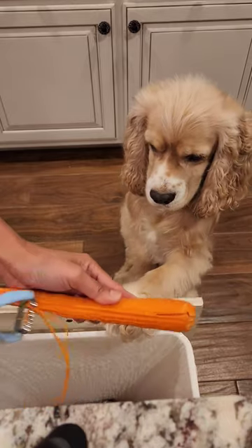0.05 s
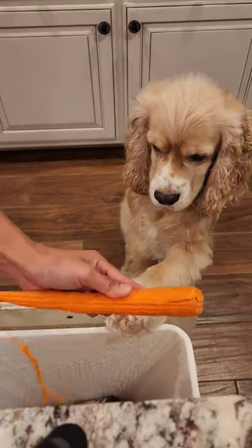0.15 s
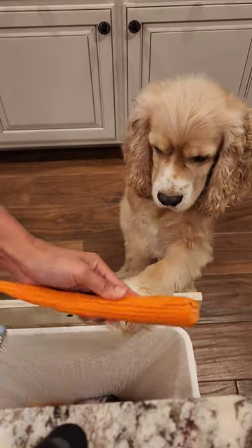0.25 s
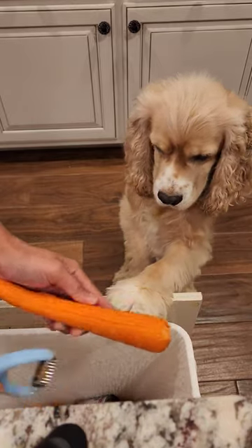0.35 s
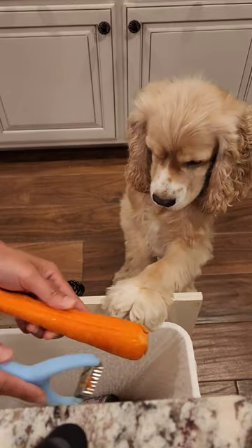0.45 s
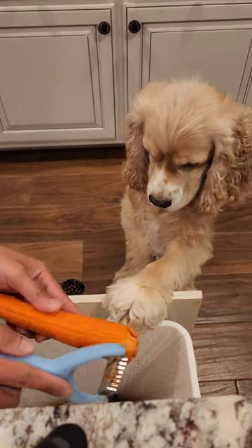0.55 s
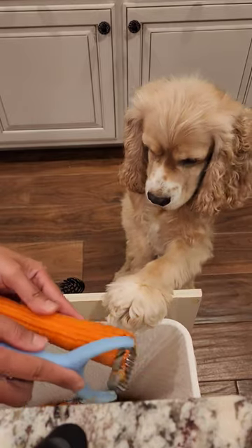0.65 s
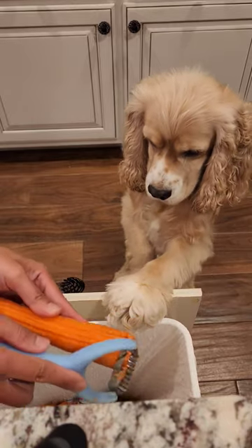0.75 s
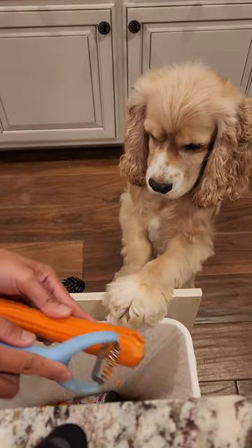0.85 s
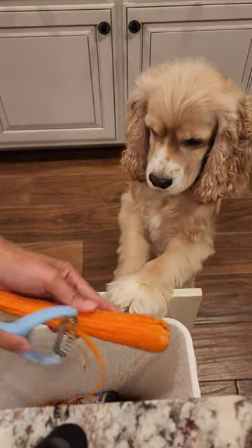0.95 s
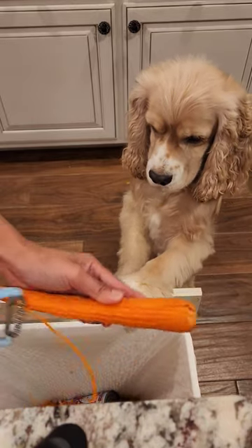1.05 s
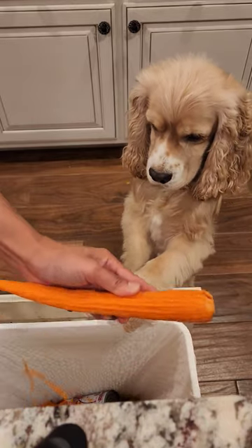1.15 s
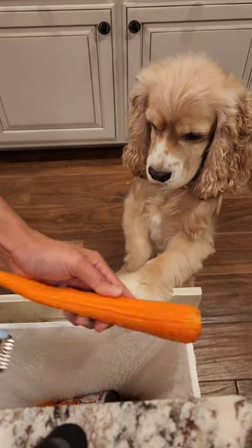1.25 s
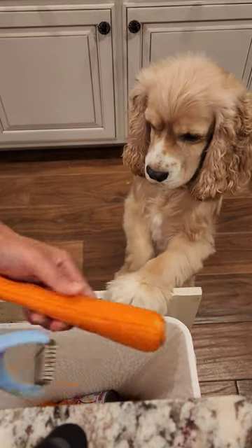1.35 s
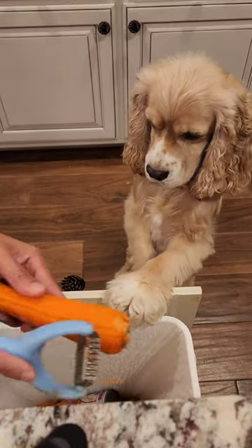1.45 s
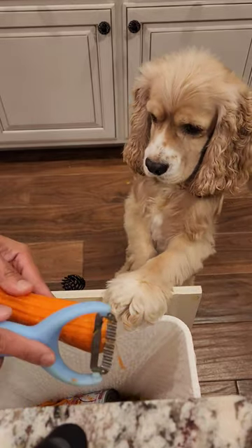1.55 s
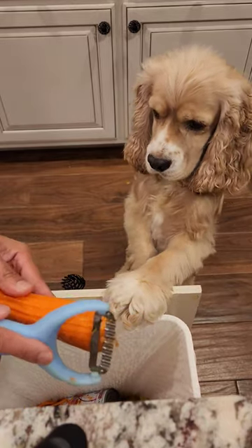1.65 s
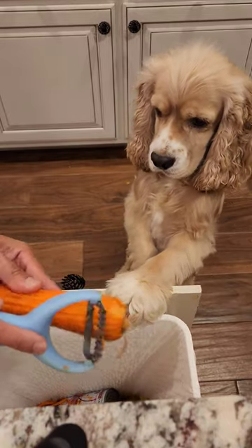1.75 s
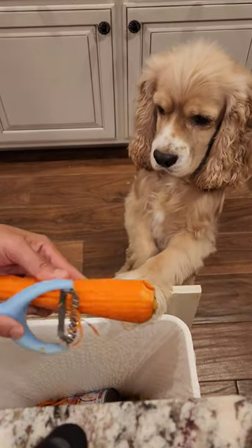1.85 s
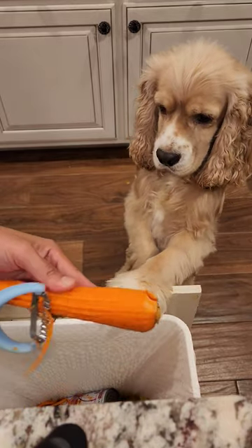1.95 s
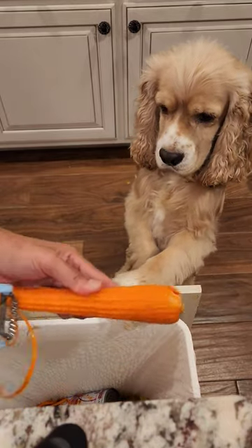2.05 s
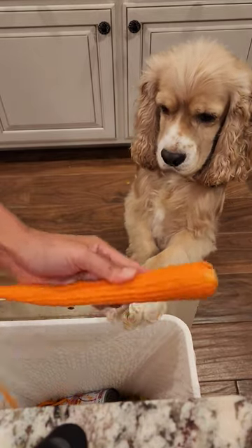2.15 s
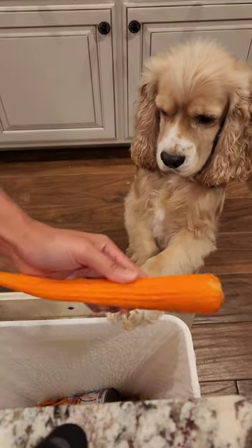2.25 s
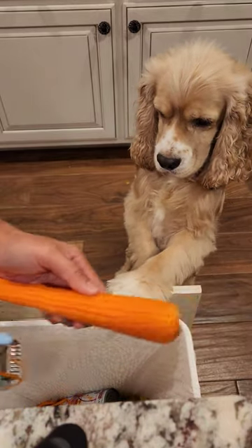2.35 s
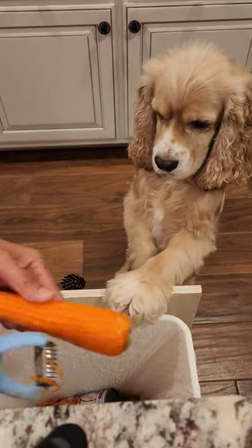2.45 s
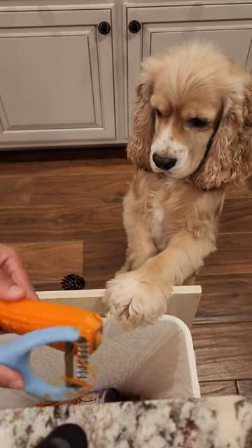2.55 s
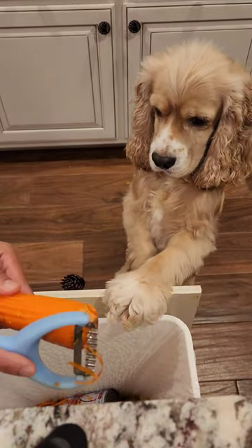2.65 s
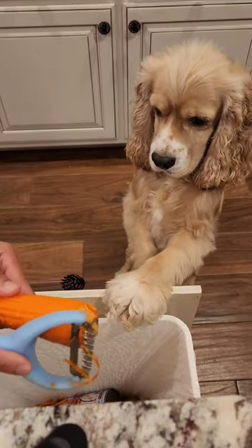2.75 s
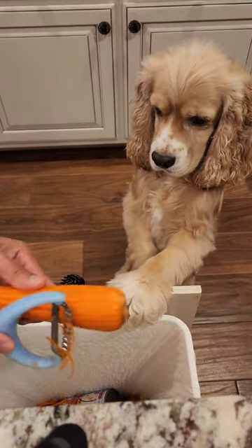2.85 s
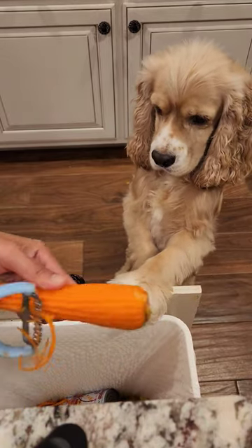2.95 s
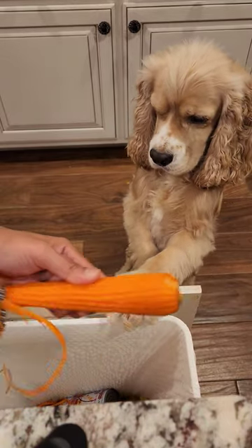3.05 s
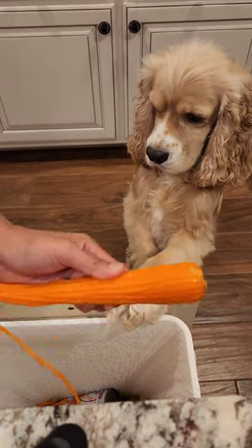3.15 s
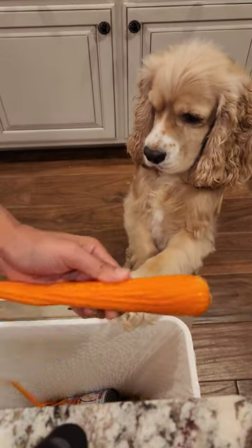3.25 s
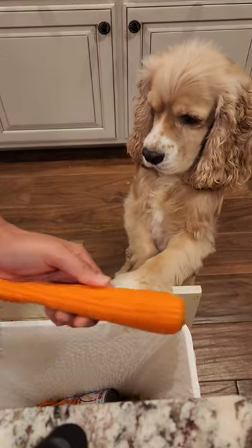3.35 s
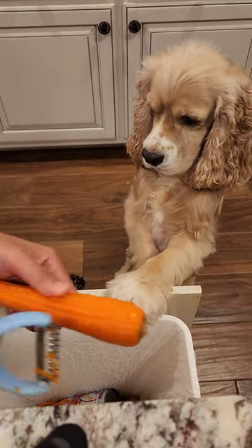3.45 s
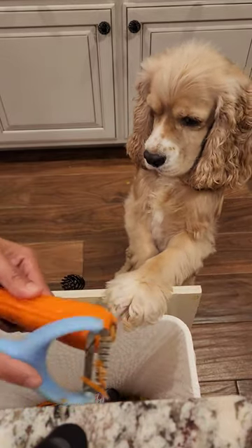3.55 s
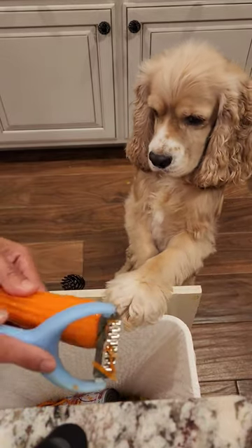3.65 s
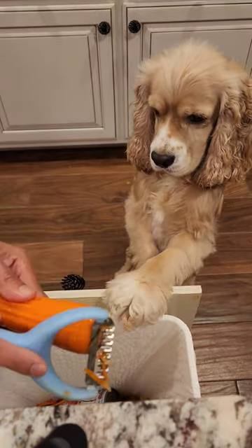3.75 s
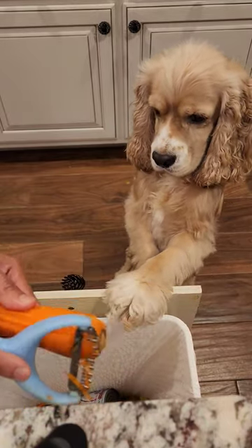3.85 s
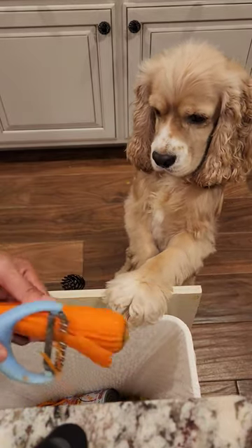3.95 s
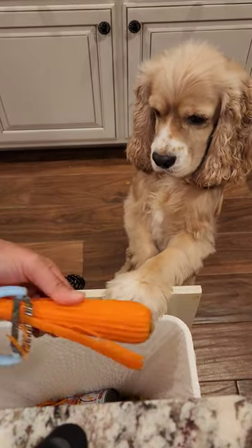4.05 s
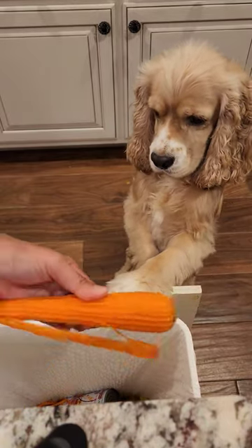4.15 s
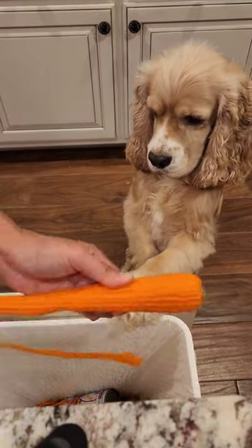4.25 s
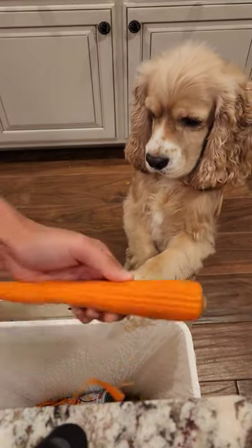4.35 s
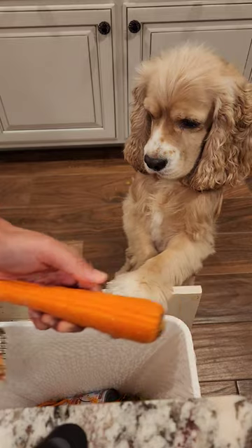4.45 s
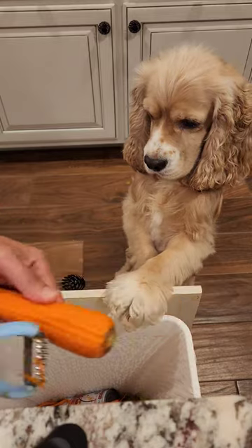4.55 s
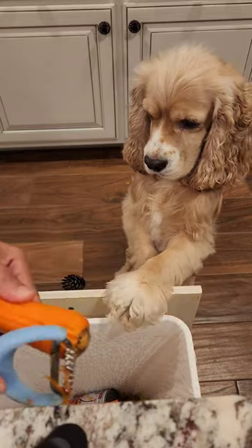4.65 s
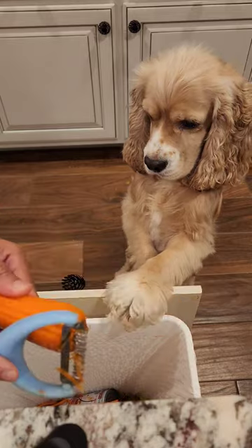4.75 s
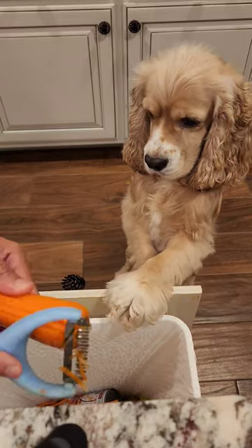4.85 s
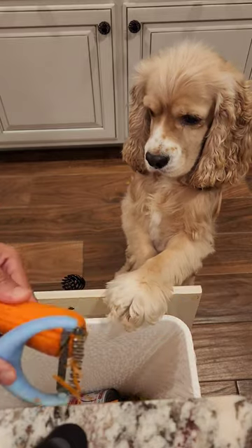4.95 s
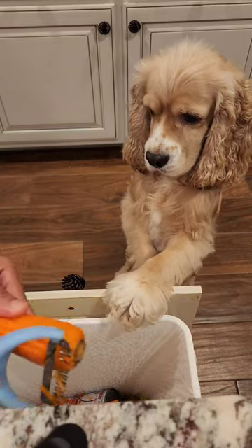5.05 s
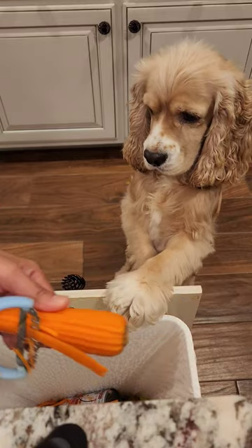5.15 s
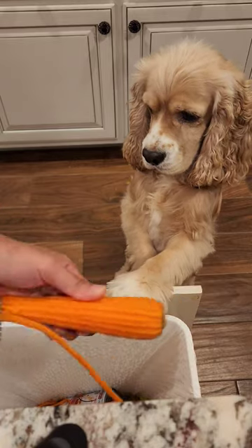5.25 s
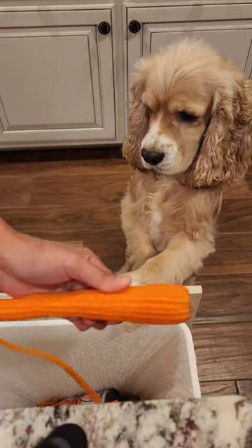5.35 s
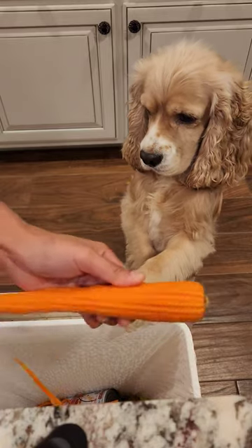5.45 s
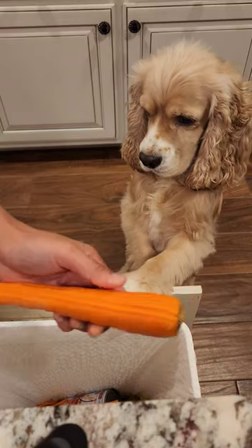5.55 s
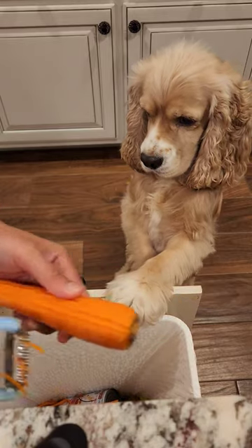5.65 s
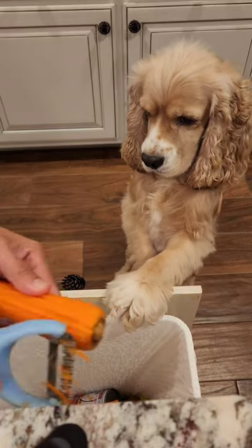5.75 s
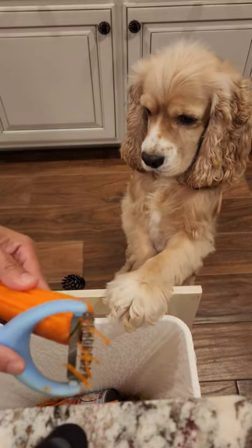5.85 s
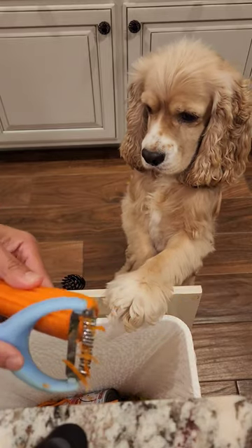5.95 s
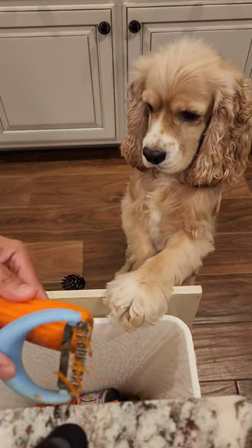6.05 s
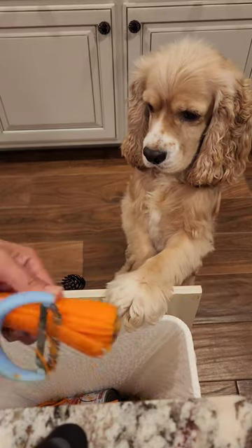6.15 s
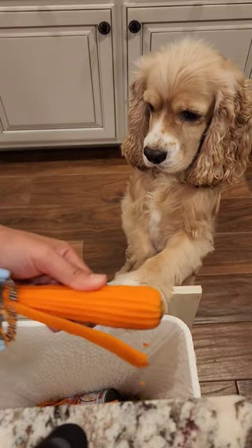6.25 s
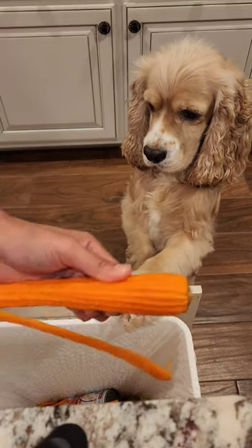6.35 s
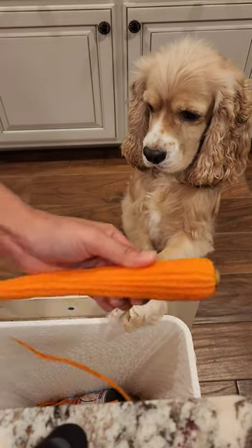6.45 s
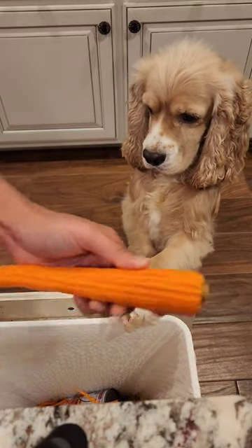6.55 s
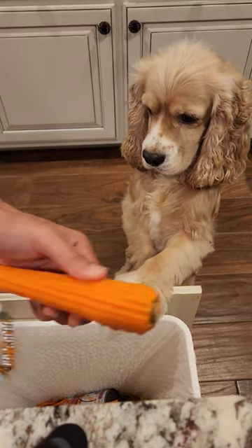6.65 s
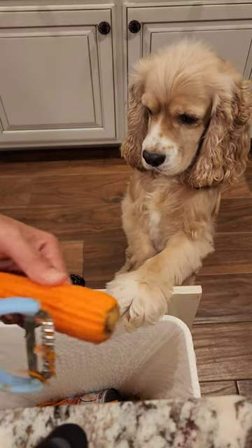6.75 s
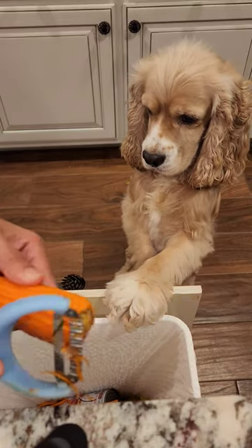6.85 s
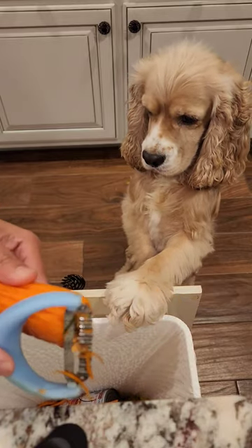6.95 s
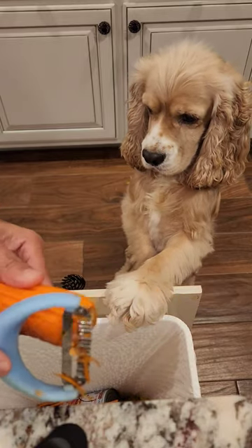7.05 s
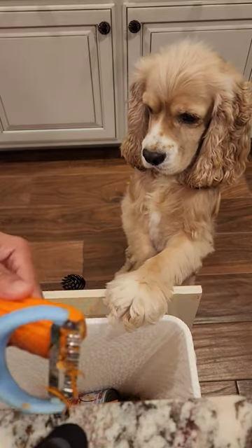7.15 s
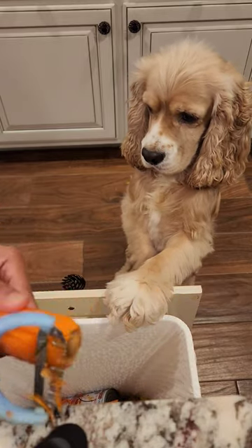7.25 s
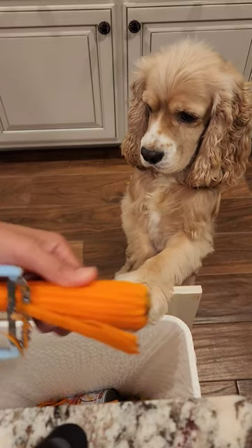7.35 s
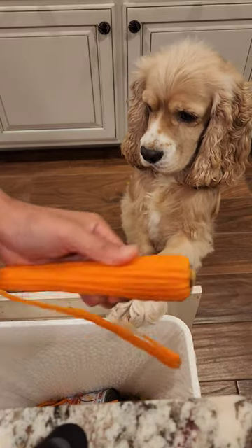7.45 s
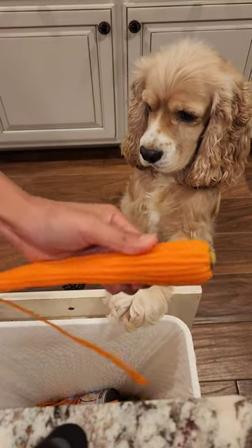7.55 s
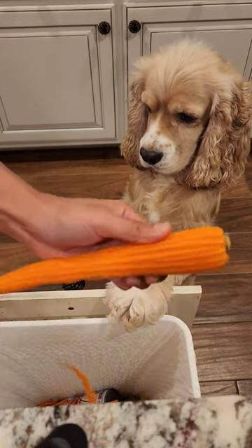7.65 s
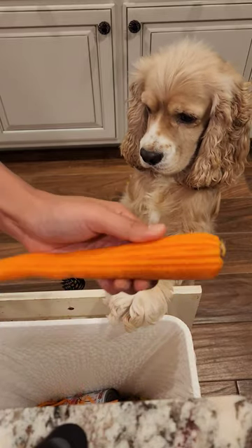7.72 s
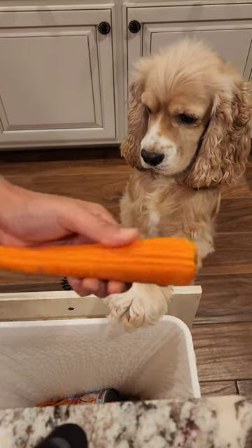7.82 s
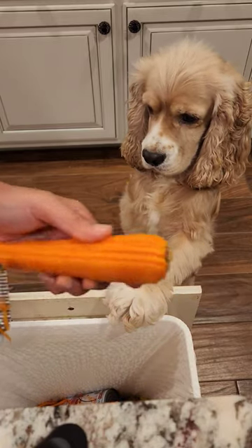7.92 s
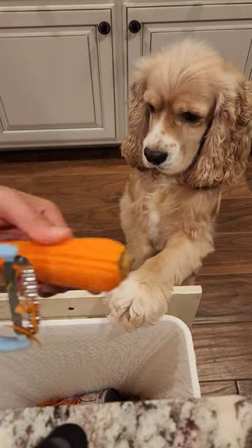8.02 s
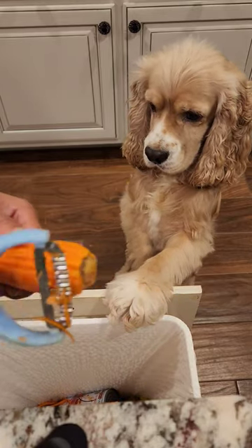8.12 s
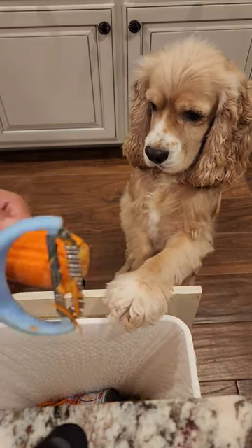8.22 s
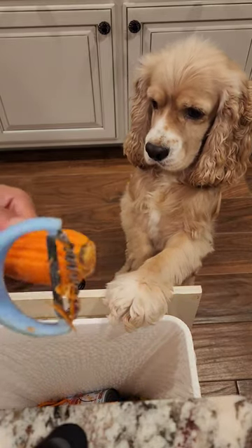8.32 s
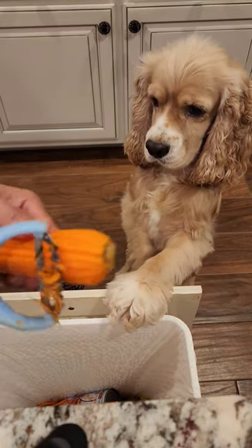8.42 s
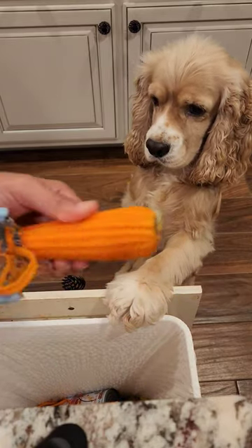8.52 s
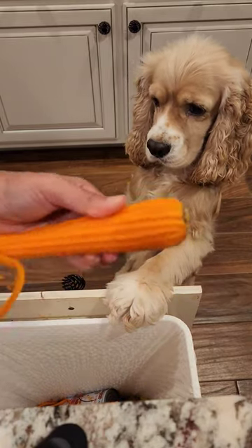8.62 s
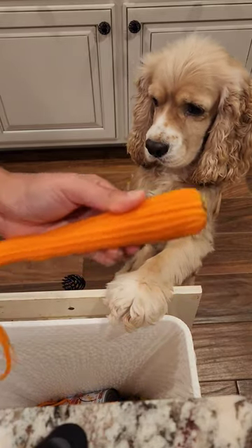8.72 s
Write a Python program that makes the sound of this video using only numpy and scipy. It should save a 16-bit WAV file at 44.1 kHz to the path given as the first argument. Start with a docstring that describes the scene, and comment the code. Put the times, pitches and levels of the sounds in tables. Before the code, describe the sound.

A peeler rasps crisp strips off a raw carrot in slow separate strokes, with blade clicks and wooden drawer knocks over a faint low hum.

```python
"""A peeler stroke, already under way, rasps through a carrot close by, over a low motor hum and soft air noise.
Rasp, crackle and fizz are trains of random ruptures, coloured by band and gated by the blade's pressure.
Tough fibres snap (noise bursts); the loose blade clicks (bursts into resonances of steel and handle).
A drawer under a dog's paws knocks and its panel rings (blows into resonances); hands, paws and peel brush
and thud (band-passed bursts). A small, hard kitchen answers: convolution with decaying noise."""
import sys
import numpy as np
from scipy import signal
from scipy.fft import rfft, irfft
from scipy.io import wavfile
from scipy.ndimage import map_coordinates

SR = 44100
rng = np.random.default_rng(int(sys.argv[2]) if len(sys.argv) > 2 else 0)


def waveform_to_disk(signal):
    """Save audio, clipped to [-1, 1], as 16-bit WAV at the path in sys.argv[1]."""
    frames = np.transpose(np.atleast_2d(signal))
    scaled = np.clip(frames, -1, 1) * 32767
    samples = np.round(scaled).astype(np.int16)
    wavfile.write(sys.argv[1], SR, samples)


N = 387198
TIME = np.arange(N) / SR  # s
FREQS = np.maximum(np.arange(N // 2 + 1) * SR / N, 1)  # Hz

# Levels are nominal: each source adds its own trim.
# appliance motor partials: [f/Hz, rms level/dB]
HUM = [(41, -70.5), (81.9, -56), (112, -69)]
# air noise spectrum, relative: [f/Hz, level/dB]
ROOM_COLOUR = [(20, -22), (50, -9.5), (130, -1.5), (280, -6.5), (400, -17), (900, -27), (3000, -33.5),
               (8500, -39), (11000, -51.5), (15500, -48.5)]
# drawer shifts under the paws: [t/s, level/dB]
KNOCKS = [(0.572, -33.5), (1.078, -35), (1.153, -39.5), (1.342, -38), (1.472, -36.5), (1.655, -36),
          (2.534, -62), (3.539, -29), (4.584, -50.5), (5.501, -33.5), (5.702, -38.5), (5.752, -36),
          (5.798, -62), (5.920, -52)]
# drawer's front panel is bumped: [t/s, peak level/dB, hardness of blow/0-1]
BUMPS = [(.505, -42.5, 0.8), (0.53, -45, 0.3), (1.505, -24, 1), (3.546, -19, 1), (5.708, -40.5, 0.7),
         (5.753, -37, 0.9), (5.798, -45.5, 0.1), (6.89, -53.5, 0.2)]
# drawer resonances: [f/Hz, width/Hz, level/dB]
DRAWER_MODES = [(185, 310, -9.5), (498, 110, -7.5), (681, 92, -1.5), (914, 300, -3.5), (1182, 33, 0),
                (1345, 220, 1), (1450, 140, 8), (1532, 190, -0.5), (1800, 260, -4.5), (2460, 800, -15),
                (2900, 280, -53)]
# front panel resonances: [f/Hz, width/Hz, level/dB]
PANEL_MODES = [(436, 92, -16.5), (1099, 60, 29.5), (1430, 16, -15.5), (1100, 5.5, -9), (1660, 46, -5.5),
               (2090, 200, -2.5), (2620, 48, -27), (2850, 82, 11), (4100, 81, -43)]
# soft brushes and thuds of hands, paws and peel; those near 3.54 s add body to the hard knock:
# [t/s, nominal length/s, level/dB, nominal f/Hz]
RUSTLES = [(0.029, 0.29, -51.5, 136), (2.455, 0.041, -53, 5900), (2.533, 0.016, -49, 740),
           (3.537, 0.023, -36.5, 390), (3.54, 0.032, -31.5, 3350), (4.574, 0.081, -53.5, 490),
           (4.677, 0.026, -58, 2790), (6.745, 0.1, -62, 1380), (6.806, 0.026, -62, 3560),
           (6.846, 0.026, -56, 3500), (7.191, 0.016, -55, 5770), (7.369, 0.018, -49, 436),
           (7.403, 0.062, -50.5, 165), (7.895, 0.016, -49, 2220), (7.918, 0.026, -44, 3100)]
# blade meets the carrot or swings against its stop: [t/s, level/dB, bright edge re level/dB]
CLICKS = [(0.3177, -37.5, -27), (0.349, -38.5, -19), (0.7906, -33.5, -9), (.806, -35.5, -2.5),
          (1.705, -29.5, -32), (1.7104, -31, -5), (2.3269, -40, -20), (2.7931, -40.5, -11),
          (3.3986, -45.5, -20), (3.5373, -29, -6), (3.7851, -28.5, -5), (4.4703, -44.5, -15),
          (4.7508, -42, -11.5), (4.9046, -49, -26), (4.9193, -37, -10.5), (5.5849, -43, -14),
          (5.6717, -46.5, -28), (6.012, -30, -8), (6.603, -42.5, -25), (6.6862, -46.5, -24),
          (7.02, -49.5, -7), (7.0663, -33.5, -14), (7.3695, -41, -33.5), (7.824, -47.5, -14),
          (7.856, -37.5, -5.5), (8.3291, -34.5, -31), (8.3324, -44, 0)]
# steel blade resonances: [f/Hz, width/Hz, level/dB]
BLADE_MODES = [(4070, 170, -1.5), (5690, 660, 0), (6250, 410, 5.5), (7960, 3200, -1), (9450, 1130, -2.5)]
# plastic handle resonances: [f/Hz, width/Hz, level/dB]
HANDLE_MODES = [(734, 1270, -4.5), (2050, 300, 2), (3120, 1050, -1.5)]
# tough fibres snap: [t/s, peak level/dB]
SNAPS = [(3.260, -29.5), (4.183, -20.5), (5.402, -21), (6.362, -22.5), (7.430, -25), (7.4535, -17.5),
         (8.738, -30), (8.768, -24)]
# peeling spectrum, relative: [f/Hz, level/dB]
PEEL_COLOUR = [(250, -10.5), (700, -11), (1150, -11.5), (1600, -11.5), (2600, -9), (4200, -10),
               (5700, -6.5), (8000, -1.5), (10100, 0.5), (11300, -4), (13200, 1), (15000, 0.5)]
# resonances of the curling peel, before glide: [f/Hz, width/Hz, level/dB]
RIBBON_MODES = [(1410, 300, -17), (2420, 930, -5.5), (3000, 103, 7.5)]
# peeler strokes: [start t/s, attack/s, start to lift/s, rasp level/dB, rasp sag/dB,
#                  crackle re rasp/dB, fizz re rasp/dB, first bite/dB]; sag and bite are scaled per layer
STROKES = [(-.06, 0.18, 0.35, -49.5, 5, 0.5, 8.5, -0.5), (.952, 0.18, .31, -47.5, 4, 0.5, 8, -0.5),
           (1.85, .13, .41, -51, 2.4, 0.5, 4, -1.5), (2.91, 0.11, 0.35, -49, -1, 2, 10, -0.5),
           (3.968, 0.11, 0.37, -47.5, 2.5, 7, 13, 1.5), (5.179, 0.088, 0.27, -48.5, -0.5, 5, 12, 3.5),
           (6.209, .1, .308, -46, 2.36, 8, 14.5, 4), (7.393, 0.053, .25, -45.5, 3, 6.5, 14, 2.5),
           (8.414, .04, 0.053, -62.5, 1.5, 4.5, 12, 1), (8.506, 0.12, 0.31, -46.5, 3.5, 5, 15, -0.5)]

ROOM_DB = -63  # air noise rms, 130-1000 Hz
HANDLE_DB = 1  # handle peak re click level
BITE_S = 0.04  # Gaussian time constant of the bite around full pressure
RIBBON_GLIDE_OCT = .35  # rise over one stroke
RIBBON_FLUTTER_OCT = .09  # rms waver as the ribbon flaps
TOP_HZ = 15550


def undb(db):
    """Decibels to gain."""
    return 10 ** (np.asarray(db) / 20)


def noise(count=N):
    """White noise."""
    return rng.standard_normal(count)


def band(x, lo_hz, hi_hz, order=2):
    """Causal band-pass."""
    edges_hz = [lo_hz, min(hi_hz, .48 * SR)]
    return signal.sosfilt(signal.butter(order, edges_hz, "band", fs=SR, output="sos"), x)


def colour(points):
    """Gain at every frequency from (Hz, dB) points, interpolated over log frequency."""
    hz, db = np.transpose(points)
    return undb(np.interp(np.log(FREQS), np.log(hz), db))


def unit(x):
    """Scale to rms 1."""
    return x / np.sqrt(np.mean(x ** 2))


def peak(x, db):
    """Scale to a peak level."""
    return x * undb(db) / np.abs(x).max()


def walk(rate_hz):
    """Smooth chance, slower than about rate_hz, with rms 1."""
    return unit(irfft(rfft(noise()) / (1 + (FREQS / rate_hz) ** 4), N))


def pan(x, db):
    """Make left louder than right by db."""
    return x * undb(np.array([[db], [-db]]) / 2)


def from_left(x, db, lag_samples=2):
    """A source on the left is louder there and reaches the right port later."""
    return pan(np.array([x, np.roll(x, lag_samples)]), db)


def add(track, s, x):
    """Mix x into the track at time s."""
    start = max(int(s * SR), 0)
    track[..., start:start + x.shape[-1]] += x[..., :N - start]


def ring(x, modes):
    """Drive damped resonances; neighbours swing in opposite senses."""
    out = 0
    for k, (hz, width_hz, db) in enumerate(modes):
        b, a = signal.iirpeak(hz, hz / width_hz, SR)
        out = out + (-1) ** k * undb(db) * signal.lfilter(b, a, x)
    return out


def burst(rise_s, fall_s, count=6000):
    """A chattering contact: noise that swells and dies."""
    t = TIME[:count]
    return noise(count) * (1 - np.exp(-t / rise_s)) * np.exp(-t / fall_s)


def blow(chatter):
    """One firm push (an impulse), followed by a few milliseconds of chatter."""
    push = chatter * burst(0.00031, 0.0061)
    push[0] += 1
    return push


def background():
    """A slightly wavering motor hum over soft air noise, alike at both ports in the bass."""
    hum = 0
    for hz, db in HUM:
        amplitude = np.sqrt(2) * undb(db + 0.53 * walk(9.5))
        phase_waver_rad = 0.064 * walk(4)
        hum = hum + amplitude * np.sin(2 * np.pi * hz * TIME + phase_waver_rad)
    side_share = 0.043 + 1.27 * FREQS / (FREQS + 1100)
    mid = irfft(rfft(noise()) * colour(ROOM_COLOUR), N)
    side = irfft(rfft(noise()) * colour(ROOM_COLOUR) * side_share, N)
    gain = undb(ROOM_DB) / np.std(band(mid, 130, 1000))
    return pan(hum, -0.75) + gain * (mid + side * np.array([[1], [-1]]))


def kitchen(x, wet_db, t60_s=0.65, treble_t60_s=0.54, air_t60_s=0.31, count=26000):
    """Reflections off counter and cabinets: a dense early cluster, then a tail whose treble dies first."""
    t = TIME[:count]
    onset = (t > .0065) * (1 + 4.8 * np.exp(-t / 0.0097))
    out = []
    for port in x * np.ones((2, 1)):
        low = band(noise(count), 82, 4200) * np.exp(-np.log(1000) * t / t60_s)
        high = band(noise(count), 5140, 11600) * np.exp(-np.log(1000) * t / treble_t60_s)
        air = band(noise(count), 6800, 23000) * np.exp(-np.log(1000) * t / air_t60_s)
        response = (low + high + air) * onset
        out.append(signal.fftconvolve(port, response / np.linalg.norm(response))[:N])
    return undb(wet_db) * np.array(out)


def drawer_rattle():
    """The drawer knocks on its runners, rattles briefly and rebounds once."""
    out = np.zeros(N)
    for s, db in KNOCKS:
        add(out, s, peak(ring(blow(chatter=0.23), DRAWER_MODES), db + 1))
        add(out, s + .013, peak(ring(blow(chatter=0.083), DRAWER_MODES), db - 10.5))
    return out


def drawer_bumps():
    """A bump sets the front panel ringing: its main mode swells, and a hard blow wakes the others."""
    out = np.zeros(N)
    for s, db, hardness in BUMPS:
        swell = ring(blow(chatter=0.01), [(1138, 81, 0.013)])
        drive = swell + hardness * blow(chatter=0.26)
        add(out, s, peak(band(ring(drive, PANEL_MODES), 200, 9100), db))
    return out


def rustles():
    """Soft brushes and thuds of hands, paws and peel; those near 3.54 s add body to the hard knock."""
    out = np.zeros(N)
    for s, length_s, db, hz in RUSTLES:
        rustle = band(burst(length_s / 8, length_s / 2, count=12000), hz / 2.16, hz * 1.51)
        add(out, s, peak(rustle, db + 5.5))
    return out


def blade_clicks():
    """The steel blade chatters on its pivot for a few milliseconds and shakes the plastic handle."""
    out = np.zeros((2, N))
    for s, db, edge_db in CLICKS:
        own = np.array([burst(0.0001, 0.0085), burst(0.00076, 0.0036)])  # differs per port
        contact = burst(0.00039, 0.0018) + 0.31 * own
        grip = 1 + 0.015 * rng.standard_normal()  # how the blade is pressed shifts its pitch
        modes = [(hz * grip, width_hz, mode_db) for hz, width_hz, mode_db in BLADE_MODES]
        steel = peak(ring(contact, modes), db + 2.5)
        edge = peak(band(contact, 8600, 16000), db + edge_db + 5)
        handle = peak(ring(contact, HANDLE_MODES), db + HANDLE_DB)
        add(out, s, steel + edge + handle)
        # a faint, soft noise burst leads each click
        lead_in = band(burst(0.0011, 0.00057), 700, 9400)
        add(out, s - .004, peak(lead_in, db - 18))
    return pan(out, 0.35)


def snaps():
    """A fibre gives way with one sharp crack, heard at both ports."""
    out = np.zeros((2, N))
    for s, db in SNAPS:
        own = np.array([burst(.0001, 0.0013), burst(.0001, 0.00084)])
        crack = burst(.0001, 0.004) + 0.26 * own
        add(out, s, peak(band(crack, 8200, 12000), db))
    return out


def grains(rate_per_s, spread_db):
    """Tiny ruptures at random moments, most weak and a few strong."""
    size = undb(spread_db * np.minimum(rng.exponential(size=N), 3))
    return unit((rng.random(N) < rate_per_s / SR) * size * np.sign(noise()))


def ruptures(rate_per_s, spread_db, alike):
    """Grains at two microphone ports; only a share of the power reaches both alike."""
    alike = np.clip(alike, 0, 1)
    own = np.array([grains(rate_per_s, spread_db), grains(rate_per_s, spread_db)])
    return np.sqrt(alike) * grains(rate_per_s, spread_db) + np.sqrt(1 - alike) * own


def stroke_gain(layer, catch, power, bite_share, sag_factor, release_db_per_s):
    """One layer's gain: the blade catches with a share of its pressure, presses in, bites, eases off and lifts."""
    gain = np.zeros(N)
    for start_s, attack_s, length_s, rasp_db, sag_db, crackle_db, fizz_db, bite_db in STROKES:
        now = (TIME > start_s) & (TIME < start_s + 1)
        t = TIME[now] - start_s
        pressure = np.clip(catch + (1 - catch) * t / attack_s, 0, 1)
        along = np.clip((t - attack_s) / (length_s - attack_s), 0, 1)
        level_db = rasp_db + {"rasp": 0, "crackle": crackle_db, "fizz": fizz_db}[layer]
        dig_db = bite_share * bite_db * np.exp(-((t - attack_s) / BITE_S) ** 2)
        ease_db = sag_factor * sag_db * along
        lift_db = release_db_per_s * np.maximum(t - length_s, 0)
        gain[now] += pressure ** power * undb(level_db + dig_db - ease_db - lift_db)
    return gain


def stroke_gains():
    """The rasp sounds at the lightest touch; crackle and fizz need more pressure and stop sooner."""
    rasp = stroke_gain("rasp", catch=0.17, power=0.72, bite_share=1.0, sag_factor=1.05,
                       release_db_per_s=133)
    crackle = stroke_gain("crackle", catch=0.088, power=1.45, bite_share=2.0, sag_factor=2.05,
                          release_db_per_s=197.5)
    fizz = stroke_gain("fizz", catch=0.074, power=1.7, bite_share=0, sag_factor=2.6,
                       release_db_per_s=270)
    return rasp, crackle, fizz


def ribbon_glide(x):
    """The ribbon's resonances start low and rise, wavering, as the blade runs: x is read at varying speed."""
    octaves = np.zeros(N)
    for start_s, _, length_s, *_ in STROKES:
        along = np.clip((TIME - start_s) / length_s, 0, 1)
        octaves = np.where(TIME >= start_s, RIBBON_GLIDE_OCT * (along - .5), octaves)
    at = np.cumsum(2 ** (octaves + RIBBON_FLUTTER_OCT * walk(200)))
    return np.array([map_coordinates(port, [at], order=3, mode="mirror") for port in x])


def curling_ribbon(rasp):
    """The rasp drives the growing ribbon of peel; now one resonance stands out, now another."""
    ringing = sum(ring(rasp, [mode]) * undb(3.3 * walk(21)) for mode in RIBBON_MODES)
    return ribbon_glide(ringing) * undb(1.0)


def wander(x, lag_s, share):
    """Add a reflection off the moving hand; its changing path sweeps shallow notches through the sound."""
    at = np.arange(N) - SR * lag_s * (1 + 0.077 * walk(2.3))
    reflection = np.array([map_coordinates(port, [at], order=3) for port in x])
    return (x + share * reflection) / np.hypot(1, share)


def peeling():
    """The blade sticks and slips through the cells; coarse, fine and finest ruptures share its judder."""
    judder_db = 1.0 * walk(60) + 1.2 * walk(450)
    # power splits: rasp | 5.5 kHz | crackle | 11.5 kHz | fizz
    above_rasp = 1 / (1 + (5500 / FREQS) ** 8)
    above_crackle = 1 / (1 + (11500 / FREQS) ** 16)
    rasp_share = (1 - above_rasp) / (1 + (250 / FREQS) ** 4)
    crackle_share = above_rasp * (1 - above_crackle)

    def layer(source, share, flicker_db):
        """Colour one band of ruptures and let its level judder and flicker."""
        sound = unit(irfft(rfft(source) * colour(PEEL_COLOUR) * np.sqrt(share), N))
        return sound * undb(judder_db + flicker_db * walk(160))

    rasp = layer(ruptures(5000, 1.4, alike=0.67), rasp_share, flicker_db=0.0)
    crackle = layer(ruptures(4000, 5.2, alike=0.35), crackle_share, flicker_db=1.4)
    fizz = layer(ruptures(8000, 0.93, alike=0.098), above_crackle, flicker_db=3.0)
    rasp = unit(rasp + curling_ribbon(rasp))
    # now and then a whole cluster of cells tears at once
    tears = unit(band(ruptures(100, 1.5, alike=0.22), 1600, 11000))
    rasp_gain, crackle_gain, fizz_gain = stroke_gains()
    rasp = pan(rasp + undb(-7.5) * tears, 0.8) * undb(1.23) * rasp_gain
    crackle = pan(crackle, -1) * crackle_gain
    fizz = pan(fizz, 3.8) * undb(2.0) * fizz_gain
    return wander(rasp + crackle + fizz, lag_s=.0013, share=0.18)


def scene():
    """Hands and peeler are near and fairly dry; the drawer is lower down, its rattle the most reverberant."""
    rattle = drawer_rattle()
    bumps = drawer_bumps()
    rustling = rustles()
    clicks = blade_clicks()
    cutting = peeling() + snaps()
    drawer = from_left(rattle, 3.8) + from_left(bumps, 6.6, lag_samples=4)
    direct = drawer + rustling + clicks + cutting
    drawer_send = undb(7) * rattle + undb(-0.5) * bumps
    near_send = undb(2.5) * rustling + undb(-1.0) * clicks + undb(-5.0) * cutting
    return background() + kitchen(drawer_send + near_send, wet_db=-6.0) + direct


def record(dry):
    """Steep elliptic low-pass at TOP_HZ."""
    return signal.sosfilt(signal.ellip(10, .2, 80, TOP_HZ, fs=SR, output="sos"), dry)


dry = scene()
out = record(dry)
waveform_to_disk(out)
```